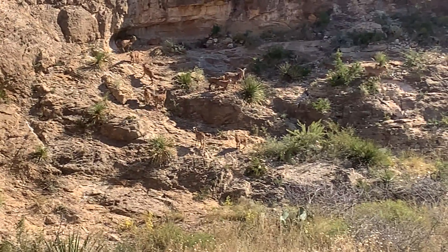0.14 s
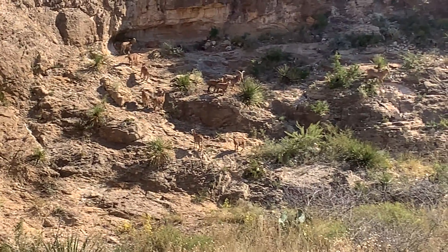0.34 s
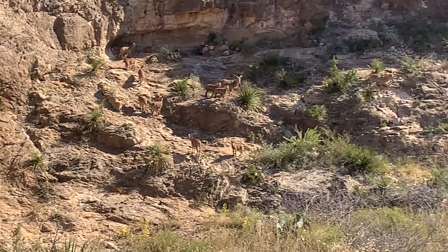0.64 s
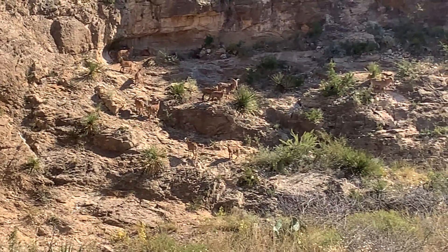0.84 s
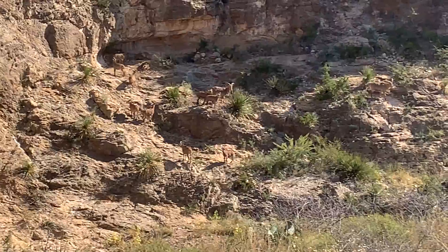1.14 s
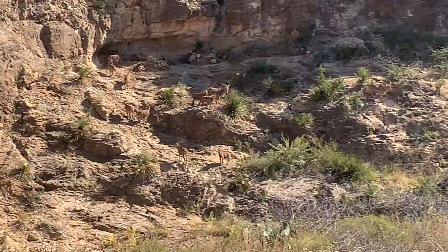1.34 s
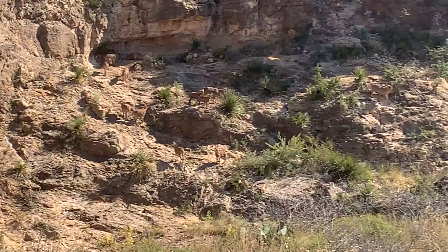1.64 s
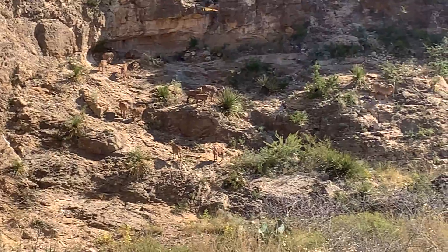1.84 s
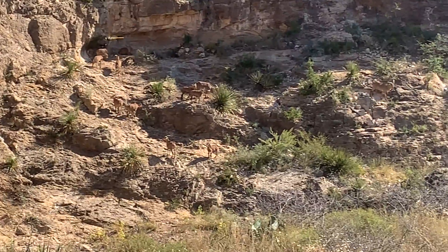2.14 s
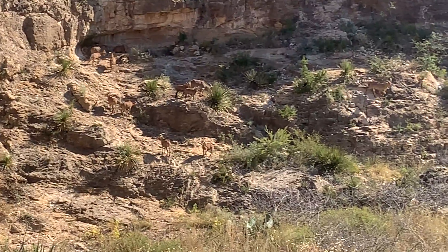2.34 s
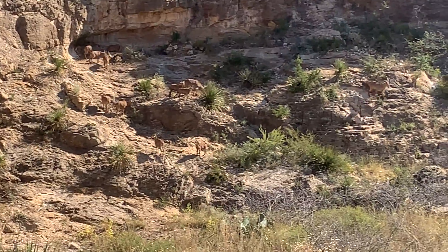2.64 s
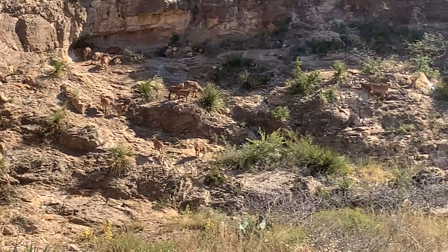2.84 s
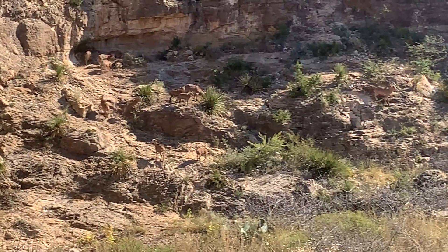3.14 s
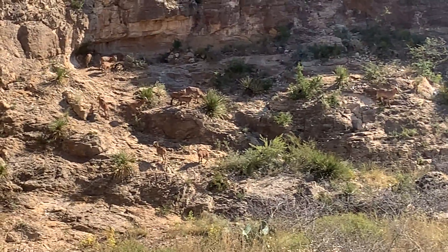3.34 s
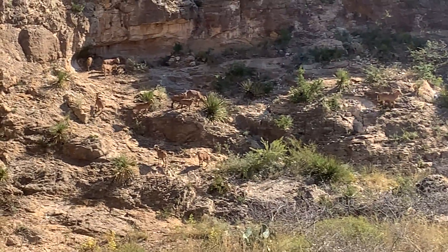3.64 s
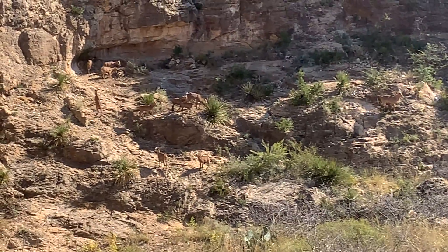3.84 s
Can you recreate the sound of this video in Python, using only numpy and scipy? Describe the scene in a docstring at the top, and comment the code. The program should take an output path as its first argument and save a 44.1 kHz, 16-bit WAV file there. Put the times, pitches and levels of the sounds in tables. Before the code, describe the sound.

Low, uneven wind buffeting on an open-air microphone, first light, then heavier past two seconds. Distant sheep hooves click on rock throughout, clearer near three and four seconds, over faint rustling brush and hiss.

```python
"""Breeze on a rocky hillside

Eddies of a light breeze buffet the microphone: soft low thumps and sharper slaps over a thin rumble.
Far off, hooves of climbing sheep knock and small stones tick, and air washes through the brush.
Underneath lie the recorder's hiss and a faint whine. Wind, stones and hiss are shaped noise,
the slaps are filtered single pulses, and the whine is a set of wavering sine tones."""
import sys
import numpy as np
from scipy import signal
from scipy.fft import rfft, irfft
from scipy.io import wavfile

SR = 44100
rng = np.random.default_rng(int(sys.argv[2]) if len(sys.argv) > 2 else 0)


def transcribe(u):
    """Save the signal u as a 16-bit wav file named by the first command-line argument.

    u: samples, shape (n,) or (channels, n), limited to [-1, 1]; the rate is SR.
    q: integer samples, one column per channel.
    """
    v = np.clip(np.atleast_2d(u).T, -1, 1)
    q = np.round(v * 32767).astype(np.int16)
    wavfile.write(sys.argv[1], SR, q)


N = 176400   # samples: 4 s

WIND_LIKENESS = 0.81   # how alike left and right are in the wind: 0 unrelated, 1 identical


def from_db(db):
    """Turn decibels into a gain."""
    return 10 ** (np.asarray(db) / 20)


def rms_one(x):
    """Scale a sound to an average power of 1."""
    return x / np.sqrt(np.mean(x ** 2) + 1e-30)


def in_time(rows):
    """Draw straight lines between the rows of a table, giving each column at every sample."""
    s, *columns = np.transpose(rows)
    return [np.interp(np.arange(N) / SR, s, column) for column in columns]


def pan(db):
    """Gains that make the left channel louder than the right by this many decibels."""
    return from_db(np.array([[db], [-db]]) / 2)


def drift(hz):
    """A random curve with spread 1, mostly slower than the given frequency."""
    f = np.fft.rfftfreq(N, 1 / SR)
    slow = rfft(rng.standard_normal(N)) / (1 + (f / hz) ** 2)
    return rms_one(irfft(slow, N))


def white_pair(likeness, size=N):
    """White noise for left and right; likeness is the correlation between them."""
    mid, side = rng.standard_normal((2, size))
    opposite = np.array([[1], [-1]])
    return np.sqrt(1 + likeness) * mid + np.sqrt(1 - likeness) * side * opposite


def coloured(x, spectrum):
    """Shape noise to a spectrum that falls away beyond both ends, then scale its power to 1."""
    hz, db = np.transpose(spectrum)
    f = np.fft.rfftfreq(N, 1 / SR) + 1e-3   # avoids log(0)
    gain = from_db(np.interp(np.log(f), np.log(hz), db))
    gain = gain * np.minimum(1, f / hz[0]) * np.minimum(1, hz[-1] / f) ** 2
    return rms_one(irfft(rfft(x) * gain, N))


def butter(x, hz, kind, order=2):
    """Keep the low, high or middle frequencies with a smooth (Butterworth) filter."""
    safe_hz = np.clip(hz, 10, .45 * SR)
    return signal.sosfilt(signal.butter(order, safe_hz, kind, fs=SR, output="sos"), x)


def add(out, s, sound):
    """Mix a sound in from time s, leaving off what lies outside the scene."""
    i = int(s * SR)
    a, b = max(i, 0), min(i + sound.shape[1], N)
    out[:, a:b] += sound[:, a - i:b - i]


def patchy(x, depth_db):
    """Let each third-octave band swell and sink by itself; the end bands take in all beyond."""
    f = np.clip(np.fft.rfftfreq(N, 1 / SR), 400, 6400)
    thirds, spectrum = 3 * np.log2(f / 400), rfft(x)
    out = 0
    for k in range(13):
        swell = from_db(depth_db * drift(15.3))   # drift speed in Hz
        band = irfft(spectrum * np.maximum(0, 1 - abs(thirds - k)), N)
        out = out + swell * band
    return rms_one(out)


# Eddies that hit the microphone: t/s of the middle, length/s, level/dB before BUFFET_DB, top edge f/Hz
BUFFETS = [(0.185, 0.03, -38.5, 173), (0.579, 0.036, -42, 127), (0.616, 0.025, -44, 151),
           (0.669, 0.015, -36.5, 98), (0.822, 0.082, -46, 163), (1.134, 0.027, -43, 206),
           (1.173, 0.017, -29, 124), (1.261, 0.017, -35.5, 132), (1.374, 0.045, -43.5, 118),
           (1.41, 0.015, -41, 265), (1.444, 0.032, -32.5, 162), (2.216, 0.02, -43.5, 134),
           (2.277, 0.058, -36, 257), (2.46, 0.033, -30, 200), (2.559, 0.036, -38, 226),
           (2.736, 0.019, -23.5, 130), (2.764, 0.0077, -28.5, 99), (2.786, 0.015, -26.5, 109),
           (2.835, 0.03, -37, 135), (2.982, 0.035, -38, 129), (3.108, 0.038, -36.5, 129),
           (3.238, 0.05, -34.5, 247), (3.606, 0.018, -37.5, 170), (3.939, 0.025, -35.5, 106),
           (3.995, 0.013, -41, 180)]
# Broad bands that make up one eddy: f/Hz, level/dB relative to the eddy
EDDY_BANDS = [(77, 0.5), (140, -5.5), (270, -17), (560, -29)]
BUFFET_DB, EDDY_BAND_OCTAVES = -3, 0.47   # level shift of all eddies; width of each band
EDDY_SHAPE = 1.26        # 1 is a sharp peak, 2 a round swell
EDDY_FALL_RATIO = 1.084  # above 1, an eddy dies more slowly than it builds
EDDY_EDGE_POWER = 15.5   # how steeply an eddy stops at its top edge


def buffets():
    """Each eddy is a peaked swell of random pressure swings in broad bands, up to its own top edge."""
    out, size = np.zeros((2, N)), 16384
    t = (np.arange(size) - size / 2) / SR
    f = np.fft.rfftfreq(size, 1 / SR) + 1   # avoids log(0)
    for s, length, db, top_hz in BUFFETS:
        width = length * EDDY_FALL_RATIO ** np.sign(t)
        envelope = np.exp(-2 * np.abs(t / width) ** EDDY_SHAPE)
        for hz, band_db in EDDY_BANDS:
            swell = white_pair(WIND_LIKENESS, size=size) * envelope
            band_shape = np.exp(-.5 * (np.log2(f / hz) / EDDY_BAND_OCTAVES) ** 2)
            band = rms_one(irfft(rfft(swell) * band_shape, size))
            band = band * np.sqrt(length * SR / size)   # longer eddies carry more energy
            edge = 1 / np.sqrt(1 + (hz / top_hz) ** EDDY_EDGE_POWER)
            add(out, s + t[0], from_db(db + band_db + BUFFET_DB) * edge * band)
    return out


# Single sharp slaps of air on the microphone's ports: t/s, peak level/dB, top edge f/Hz
SLAPS = [(2.447, -25, 390), (2.547, -42, 495), (2.567, -42.5, 660), (3.408, -29.5, 320),
         (3.474, -45.5, 487), (3.574, -47.5, 370)]
SLAP_LOW_HZ, SLAP_BODY_HZ = 58.5, 165   # bass cut; start of the gentle treble fall


def slaps():
    """One pressure pulse each, rounded by the ports and swinging back through the bass cut."""
    out = np.zeros((2, N))
    for s, db, top_hz in SLAPS:
        pulse = butter(signal.unit_impulse(SR // 10), top_hz, "low", order=6)
        pulse = butter(pulse, SLAP_BODY_HZ, "low", order=1)
        pulse = butter(pulse, SLAP_LOW_HZ, "high", order=3)
        add(out, s, from_db(db) * pan(0) * pulse / np.abs(pulse).max())
    return out


# Strength of the rumble, before its flutter: t/s, level/dB
BREEZE = [(0, -54.5), (.5, -55.5), (.75, -51.5), (1.0, -53), (1.3, -41), (1.56, -54.5), (1.75, -50.5),
          (1.95, -45), (2.3, -43), (2.65, -50), (2.88, -39), (3.1, -43.5), (3.35, -43.5), (3.55, -49),
          (3.83, -54.5), (4, -37)]
# Colour of the rumble: f/Hz, relative level/dB per Hz
RUMBLE = [(24, -13.5), (36, -2), (65, 4), (110, -7), (160, -15), (250, -26.5), (400, -43.5), (700, -51)]
RUMBLE_FLUTTER_DB, FLUTTER_HZ = 3, 12.7


def rumble():
    """Turbulence at the ports is low noise that follows the breeze and flutters."""
    level_db, = in_time(BREEZE)
    flutter_db = RUMBLE_FLUTTER_DB * drift(FLUTTER_HZ)
    return from_db(level_db + flutter_db) * coloured(white_pair(WIND_LIKENESS), RUMBLE)


# Hooves and stones on rock: t/s, level/dB before KNOCK_DB, ring f/Hz, length of the crunch/s
KNOCKS = [(0.055, -66.5, 6300, 0.0029), (0.056, -62, 2740, 0.0033), (0.127, -62.5, 2560, 0.0065),
          (0.431, -69, 2640, .004), (1.004, -73, 4130, .006), (1.065, -69, 2400, 0.0033),
          (1.477, -58.5, 2380, 0.0048), (1.482, -61.5, 3760, 0.0025), (1.501, -67, 3000, .008),
          (1.5178, -60.5, 2470, 0.0024), (1.517, -68, 10100, 0.0011), (1.712, -71.5, 3560, 0.0059),
          (2.097, -75, 3800, 0.023), (2.272, -62.5, 2250, 0.0054), (2.398, -64, 2420, .006),
          (2.505, -73.5, 4300, 0.017), (2.595, -64.5, 2560, .005), (2.766, -61.5, 3520, 0.0045),
          (2.767, -73, 6100, .004), (2.838, -62, 1890, 0.0037), (2.973, -69.5, 3300, 0.016),
          (3.054, -76, 5240, 0.022), (3.117, -51, 1300, 0.0045), (3.117, -60, 2800, 0.0038),
          (3.135, -54.5, 1970, 0.0018), (3.204, -66.5, 3330, 0.0046), (3.234, -70, 4160, 0.0026),
          (3.382, -58, 1890, 0.0055), (3.387, -59, 3170, 0.0039), (3.62, -70, 3280, .004),
          (3.785, -63.5, 2130, 0.0044), (3.971, -51, 1630, 0.0046), (3.972, -66, 3940, 0.0043)]
# Colour of the crack of a contact, before it is narrowed: f/Hz, relative level/dB per Hz
STONE = [(400, -14), (900, 0.5), (1900, 0.5), (2800, -7.5), (4200, -21), (6000, -22.5), (8000, -28)]
KNOCK_DB, KNOCK_LIKENESS = -2, 0.15            # level shift of all knocks; left-right likeness
KNOCK_ATTACK_S, KNOCK_T60_S = 0.0003, 0.016    # build-up; time to fall by 60 dB after the crunch
CLIFF_DB, CLIFF_T60_S = -11.5, 0.3             # start level and 60 dB fall time of the scatter
CRACK_LOW_RATIO, CRACK_TOP_RATIO = 0.48, 2.04  # edges of the crack as multiples of the ring
RING_SHARE, RING_Q = 0.45, 4.2                 # ring's part of the power; its narrowness


def knocks():
    """A brief crunch mixes a crack with a stony ring, trailed by the cliff's scatter."""
    out, size = np.zeros((2, N)), SR // 2
    t = np.arange(size) / SR
    cracks = coloured(white_pair(KNOCK_LIKENESS), STONE)
    for s, db, hz, length in KNOCKS:
        contact = from_db(-60 * np.maximum(t - length, 0) / KNOCK_T60_S)
        scatter = from_db(CLIFF_DB - 60 * t / CLIFF_T60_S)
        envelope = (1 - np.exp(-t / KNOCK_ATTACK_S)) * np.maximum(contact, scatter)
        # the crack is cut from one long noise at the knock's own time
        crack = np.roll(cracks, -int(s * SR), axis=1)[:, :size]
        crack = rms_one(butter(crack, [hz * CRACK_LOW_RATIO, hz * CRACK_TOP_RATIO], "band"))
        ring_edges = [hz * (1 - .5 / RING_Q), hz * (1 + .5 / RING_Q)]
        ring = rms_one(butter(white_pair(KNOCK_LIKENESS, size=size), ring_edges, "band"))
        stone = np.sqrt(1 - RING_SHARE) * crack + np.sqrt(RING_SHARE) * ring
        add(out, s, from_db(db + KNOCK_DB) * envelope * stone)
    return out


# Far air in the brush (its rustle also drives the grit), before the level shifts below:
# t/s, body level/dB, dry rustle level/dB
AIR = [(0, -71.5, -80.5), (.9, -69, -88), (1.45, -70.5, -82), (1.8, -69.5, -85.5), (2.1, -70.5, -84),
       (2.55, -70, -73), (2.9, -68, -81), (3.2, -68.5, -80), (3.6, -70.5, -80.5), (4, -71, -83)]
# Colour of the body: f/Hz, relative level/dB per Hz
AIR_BODY = [(150, 6.5), (350, -1.5), (620, 0), (720, -1.5), (930, 2), (1150, -3), (1400, -1.5),
            (1680, -7.5), (1950, -9), (2500, -18), (4000, -31.5)]
# Colour of the rustle: f/Hz, relative level/dB per Hz
AIR_RUSTLE = [(1000, -9.5), (2000, -1.5), (2500, -4.5), (3100, -9), (3800, -18.5), (5000, -18.5),
              (7500, -35)]
# level shift, how much louder the left is, depth of the flutter
AIR_DB, AIR_PAN_DB, AIR_FLUTTER_DB = 6.5, 0.3, 2.5
RUSTLE_DB, RUSTLE_PAN_DB, RUSTLE_FLUTTER_DB = 2.1, 5, 3


def far_air():
    """A soft wash of noise from the hillside, with the drier rustle of brush on top."""
    body_db, rustle_db = in_time(AIR)
    body = patchy(coloured(white_pair(0), AIR_BODY), AIR_FLUTTER_DB)
    body = from_db(body_db + AIR_DB) * body
    rustle = patchy(coloured(white_pair(0), AIR_RUSTLE), RUSTLE_FLUTTER_DB)
    rustle = from_db(rustle_db + RUSTLE_DB) * rustle
    return body * pan(AIR_PAN_DB) + rustle * pan(RUSTLE_PAN_DB)


GRIT_PER_S, GRIT_T60_S = 30, 0.011     # average ticks per second; time to fall by 60 dB
GRIT_DB, GRIT_SPREAD_DB = -76.5, 4     # base level; how much some ticks stand out


def grit():
    """Tiny pebbles tick at random as short bursts of noise, louder while the slope rustles."""
    _, rustle_db = in_time(AIR)
    out, pitches = 0, np.geomspace(1900, 3500, 6)   # Hz
    decay = from_db(-60 / (GRIT_T60_S * SR))        # gain from one sample to the next
    for hz in pitches:
        happens = rng.random(N) < GRIT_PER_S / len(pitches) / SR
        hits = happens * from_db(GRIT_SPREAD_DB * np.minimum(rng.exponential(1, N), 3))
        envelope = signal.lfilter([1], [1, -decay], hits + 1e-18)   # never quite zero
        ring = rms_one(butter(white_pair(0), [hz * 0.58, hz * 1.14], "band"))
        out = out + envelope * ring * pitches[0] / hz   # higher ticks are weaker
    return out * from_db(GRIT_DB + rustle_db - rustle_db.mean())


# Colour of the hiss that each channel has alone: f/Hz, relative level/dB per Hz
OWN_HISS = [(1000, -1), (5500, -1.5), (7000, 1), (8500, -14), (16000, -15)]
# Colour of the hiss common to both channels: f/Hz, relative level/dB per Hz
COMMON_HISS = [(4000, -20), (6500, -11.5), (8200, -9), (9500, 1), (12000, 0), (16000, -1)]
# Tones of the whine: f/Hz
WHINE_HZ = [4086, 5909, 9083, 10907, 14081]
# The same tones: level/dB before wavering, phase by which the left leads/rad
WHINE = [(-94.7, -1.5), (-94.3, .3), (-82.7, 2.45), (-84.3, 0), (-90, 2.35)]
# Level change of the two lowest tones, which come and go: t/s, level/dB
LOW_WHINE = [(1.15, 1.5), (1.25, -5), (1.6, -6), (1.7, 1), (2.22, 2.5), (2.3, -11), (2.47, 4.5),
             (2.6, -5.5), (3.7, -8), (3.8, -1)]
OWN_HISS_DB, COMMON_HISS_DB, HISS_LAG_MS = -86, -83.5, .185   # lag of the common hiss on the left
WHINE_WAVER_DB, WHINE_JITTER_RAD = 1.5, 0.12


def electronics():
    """Steady hiss, its common part reaching the left slightly late, and thin wavering sine tones."""
    t, f = np.arange(N) / SR, np.fft.rfftfreq(N, 1 / SR)
    common = coloured(rng.standard_normal(N), COMMON_HISS)
    late = irfft(rfft(common) * np.exp(-2j * np.pi * f * HISS_LAG_MS / 1000), N)
    out = from_db(COMMON_HISS_DB) * np.array([late, common])
    out = out + from_db(OWN_HISS_DB) * coloured(white_pair(0), OWN_HISS)
    low_db, = in_time(LOW_WHINE)
    for k, (hz, (db, lead)) in enumerate(zip(WHINE_HZ, WHINE)):
        phase = 2 * np.pi * hz * t + WHINE_JITTER_RAD * drift(60)
        level_db = db + low_db * (k < 2) + WHINE_WAVER_DB * drift(19)
        tone = np.sqrt(2) * np.sin(phase + np.array([[lead], [0]]))   # power 1
        out = out + from_db(level_db) * tone
    return out


def scene():
    """Wind at the microphone, its deepest bass cut, before the far hillside."""
    wind = butter(rumble() + buffets(), 24.6, "high")
    return wind + slaps() + far_air() + knocks() + grit()


def record(dry):
    """The recorder adds its own noise and steeply cuts everything above 15750 Hz."""
    top_cut = signal.ellip(12, .1, 80, 15750, fs=SR, output="sos")
    return signal.sosfilt(top_cut, dry + electronics())


dry = scene()
out = record(dry)
transcribe(out)
```